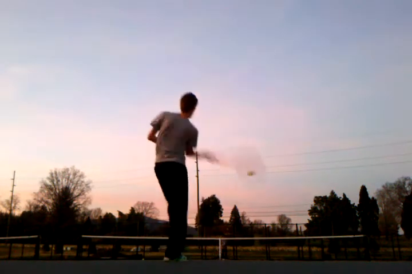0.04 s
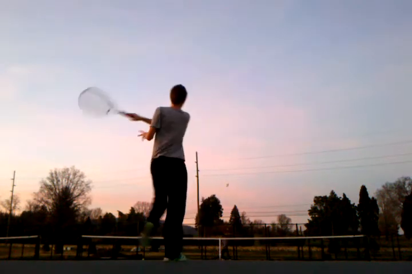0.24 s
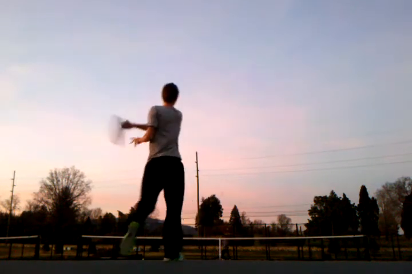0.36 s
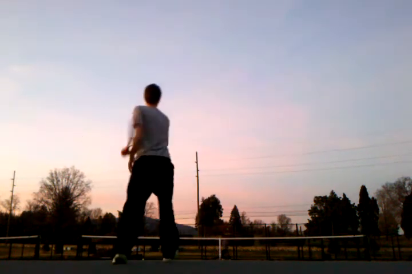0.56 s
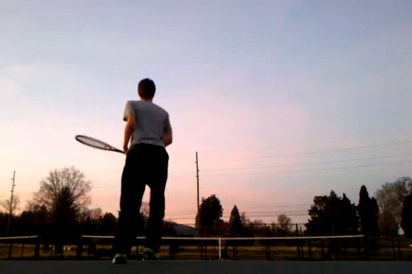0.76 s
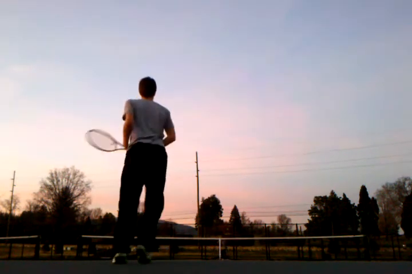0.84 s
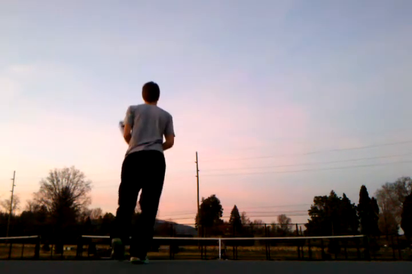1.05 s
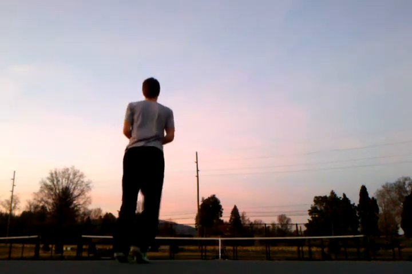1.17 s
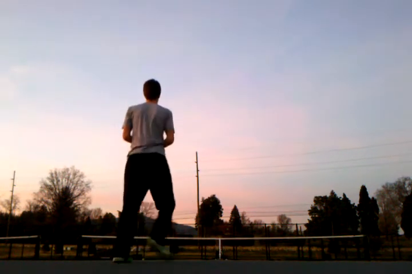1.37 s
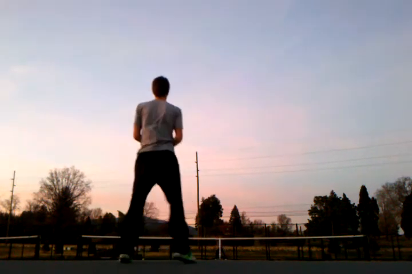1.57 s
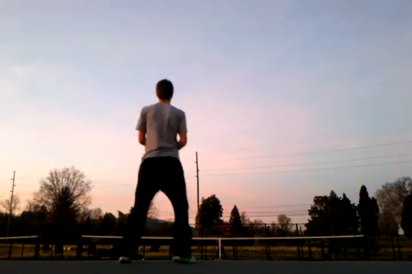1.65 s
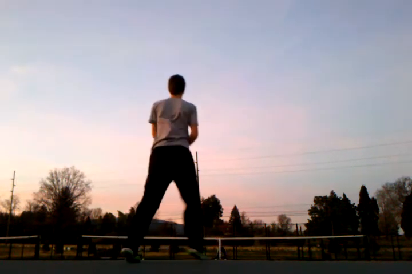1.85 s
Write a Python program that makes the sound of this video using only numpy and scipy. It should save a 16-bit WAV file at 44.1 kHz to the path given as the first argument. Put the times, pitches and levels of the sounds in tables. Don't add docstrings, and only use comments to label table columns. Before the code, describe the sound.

A racket strikes a tennis ball with a loud hollow pop, then shoes scuff gritty court

```python
import sys
import numpy as np
from scipy import signal
from scipy.io import wavfile
from scipy.ndimage import uniform_filter1d

SR = 44100
rng = np.random.default_rng(int(sys.argv[2]) if len(sys.argv) > 2 else 0)


def output_pcm(signal):
    pcm = np.clip(np.atleast_2d(signal).T, -1, 1) * 32767
    wavfile.write(sys.argv[1], SR, np.round(pcm).astype(np.int16))


def voltage_ratio(level):
    return 10 ** (np.asarray(level, float) / 20)


N = 83790

# frequency in Hz, density in dB per Hz.
TRAFFIC = [(30, -3.5), (100, 9.5), (140, -1.5), (260, -2), (320, -8.5), (750, -8.5), (1100, -13.5),
           (1600, -23.5)]
# time in seconds, level in dB.
TRAFFIC_LEVEL = [(0, -56), (.4, -53.5), (.75, -55.5), (1.2, -53.5), (1.5, -52.5), (1.9, -53.5)]
# frequency in Hz, level in dB.
HISS = [(500, -41.5), (1600, 4.5), (3000, 5.5), (5000, -17.5), (7000, -11)]
# time in seconds, level in dB.
SWING = [(.17, -67.5), (.2, -56.5), (.235, -50.5), (.27, -49), (.32, -66), (.36, -57), (.4, -65),
         (.46, -67.5)]
# frequency in Hz, level in dB.
SWISH = [(300, 0), (1500, 3), (4000, -0.5), (7000, 1.5)]
# start in seconds, level in dB, centre in Hz.
STONES = [(.6135, -49, 4600), (.6985, -49, 4000), (.922, -35.5, 5600), (1.1145, -45, 3500),
          (1.1245, -39, 4200), (1.128, -40, 4800), (1.132, -45, 5500), (1.311, -50, 5500),
          (1.3275, -44, 4300), (1.3445, -43, 5500), (1.3608, -39, 2500), (1.366, -47, 3000),
          (1.3838, -38, 6000), (1.3891, -34, 5000), (1.3935, -38, 6400), (1.416, -44, 3500),
          (1.4205, -47, 4000), (1.7055, -46, 4500), (1.7215, -46, 6200), (1.726, -45, 4600),
          (1.7375, -44, 6600), (1.7895, -45, 3800), (1.796, -50, 3000)]
# time in seconds, pressure in dB, share of coarse grit from 0 to 1.
DRAG = [(.975, -72, 0.7), (.995, -51, 0.54), (1.01, -46, 0), (1.045, -40, 0), (1.058, -30, 0.23),
        (1.076, -26.5, 0.2), (1.086, -35.5, 0.99), (1.096, -52, 0.7), (1.104, -67.5, 0.5)]
# start in seconds, rise in seconds, length in seconds, level in dB,
# share of coarse grit from 0 to 1, rubber level in dB.
SCUFFS = [(0.009, 0.0081, 0.064, -69, 0, 1.5), (0.438, 0.063, 0.089, -66, 0.6, 0),
          (0.585, 0.029, 0.45, -67, 0.52, -10), (0.656, 0.019, 0.024, -54.5, 0.68, 3),
          (0.68, 0.0058, 0.023, -63.5, 0.6, -1), (0.697, .008, 0.028, -62.5, 0.8, -2),
          (0.719, .012, .03, -69, 0.2, -7), (1.095, 0.035, 0.048, -58, 0.3, -5),
          (1.17, 0.0094, 0.041, -71, .5, -9), (1.321, 0.0068, 0.12, -65.5, 0.6, -10),
          (1.3842, .0005, .0075, -39.5, .4, -25), (1.3905, .003, .0045, -43, .4, -15),
          (1.4, 0.0054, 0.031, -72.5, 1, -2), (1.633, 0.14, 0.14, -80, 1, -5),
          (1.7356, 0.00055, 0.0092, -51, 0, -1), (1.746, 0.0012, 0.0062, -46.5, 0, -17.5)]
# frequency in Hz, level in dB.
FINE_GRIT = [(800, -50), (3000, -10), (5000, -2.5), (6000, -0.5), (6700, 4.5), (7500, 0.5)]
# frequency in Hz, level in dB.
COARSE_GRIT = [(700, -24.5), (1500, -11.5), (2350, -10), (2900, 2.5), (4200, 1.5), (5200, -0.5),
               (7000, -9.5)]
# frequency in Hz, level in dB.
RUBBER = [(800, -6), (1600, 6), (2500, -8), (4000, -3.5)]
# frequency in Hz, level in dB.
TAIL = [(150, 9), (300, 7.5), (1100, -1.5), (2000, -11.5), (4000, -11.5), (7000, -19.5)]
# frequency in Hz, time to fall 60 dB in seconds.
TAIL_T60 = [(200, 0.35), (1000, 0.93), (3000, 0.37), (7000, 0.98)]
# start in seconds, level in dB, centre in Hz, width in Hz.
RETURNS = [(.2485, -40, 6900, 500), (.2515, -33, 960, 130), (.2805, -46, 510, 480), (.2985, -52, 4600, 600),
           (.321, -50, 4300, 520), (.3425, -45, 4600, 500), (.3505, -47, 4300, 500), (.328, -50, 1050, 150),
           (.345, -49, 1100, 200), (.3525, -42.5, 1200, 200), (.388, -52, 960, 200), (.454, -54, 1050, 200)]
# start in seconds, level in dB.
TICKS = [
    (.2375, -18),
    (.23855, -10),
    (.61338, -33),
    (.61363, -38),
    (.9972, -42),
    (.99745, -41),
]
# start in seconds, level in dB, pitch in Hz, length in cycles, place of the peak from 0 to 1.
BLOWS = [(.2368, -16.5, 948, 9.4, .6), (.2383, -8.3, 290, 1.6, .21), (.2389, -18, 1300, .9, .35),
         (.2386, -25, 6400, 9, .3), (.2385, -25, 4500, 6, .35), (.61405, -29, 290, 1.5, .42),
         (.6142, -51, 1590, 6, .4), (.6139, -44, 1020, 2, .3), (.61325, -51, 3100, 7, .3),
         (.9978, -35, 330, 1.25, .25), (.9974, -54, 1540, 8, .4), (1.0021, -45, 400, 2.6, .3),
         (1.3833, -32, 3100, 4, .4), (1.3848, -32, 4900, 7, .45), (1.3872, -36, 5700, 8, .4),
         (1.3838, -48, 450, 1.8, .3), (1.383, -47, 157, 2, .4), (1.384, -50, 860, 6, .3),
         (1.7371, -42.5, 520, 2.2, .25)]
# time in seconds, level in dB.
CONTACTS = [
    (.23751, -9),
    (.23862, 0),
    (.24191, -11),
]
# frequency in Hz, level in dB, time to fall 60 dB in seconds.
RACKET = [(735, -21, 0.03), (957, -36, 0.11), (1080, -38.5, 0.13), (1310, -26.5, 0.063), (1635, -44, 0.11),
          (1706, -36, 0.066), (1980, -41, 0.078), (2135, -45.5, 0.098), (2640, -34, 0.0073),
          (3370, -43, 0.054), (3820, -52, 0.3), (4176, -24.5, 0.019), (4570, -37, 0.018),
          (2480, -36.5, .02), (3560, -42, 0.018), (5140, -34, .012), (5350, -38, .015), (6130, -30, .012),
         (6600, -31, 0.016)]
# frequency in Hz, level in dB.
CRACK = [(800, 2), (2600, -2.5), (3100, -21), (3700, 2.5), (5000, -3.5), (5600, -5), (6500, -5.5)]
# frequency in Hz, response in dB.
MIC = [(30, -33), (80, -20), (120, -2), (200, 0), (5800, 2), (6700, 4), (7100, -2), (7600, -17),
       (8200, -27), (9000, -35), (9600, -70), (11000, -95)]


def evened(x):
    return x / np.sqrt(np.mean(x ** 2) + 1e-20)


def read(points, hz):
    f, value = np.transpose(points)
    return np.interp(np.log(hz + 1), np.log(f + 1), value)


def curve(points, column=1):
    table = np.array(points)
    return np.interp(np.arange(N) / SR, table[:, 0], table[:, column])


def add(mix, s, sound):
    part = mix[max(round(s * SR), 0):][:len(sound)]
    part += sound[:len(part)]


def colour(x, points):
    log_gain = read(points, abs(np.fft.fftfreq(4096, 1 / SR))) * np.log(10) / 20
    taps = np.fft.ifft(np.exp(np.conj(signal.hilbert(log_gain)))).real[:2048]
    taps = taps * np.cos(np.arange(2048) * np.pi / 4096) ** 2
    return signal.oaconvolve(x, taps)[:len(x)]


def noise(points, length=N):
    return colour(rng.standard_normal(length), points)


def distant_traffic():
    frames, hz = N // 256 + 5, np.fft.rfftfreq(1024, 1 / SR)
    a, b, patches = rng.standard_normal((frames, 513, 3)).T
    patches = uniform_filter1d(patches, size=10, axis=0)
    patches = evened(uniform_filter1d(patches, size=8, axis=1))
    octaves_above = np.log2(np.maximum(hz / TRAFFIC[-1][0], 1))
    density = read(TRAFFIC, hz) - 14.5 * octaves_above
    z = (a + 1j * b) * voltage_ratio(density[:, None] + 0.87 * patches)
    hum = evened(signal.istft(z, nperseg=1024, noverlap=768)[1][:N])
    return voltage_ratio(curve(TRAFFIC_LEVEL)) * hum + voltage_ratio(-69) * noise(HISS)


def swish():
    return voltage_ratio(curve(SWING)) * evened(noise(SWISH))


def stones():
    out = np.zeros(N)
    ring_cycles = 2.6
    for s, db, hz in STONES:
        cycles = np.arange(200) / SR * hz
        add(out, s, voltage_ratio(db) * np.exp(-cycles * np.pi / ring_cycles) * np.sin(2 * np.pi * cycles))
    return out


def grit(points):
    grains_per_s, spread_db = 7000, 3
    size = voltage_ratio(spread_db * np.minimum(rng.exponential(1, N), 5))
    sign = rng.choice([-1., 1.], N)
    clicks = size * sign * (rng.random(N) < grains_per_s / SR)
    return evened(colour(clicks, points))


def soles():
    pressure, share = curve(DRAG), curve(DRAG, column=2)
    level = voltage_ratio(pressure) * (pressure > -71)
    fine, coarse, rub = level * np.sqrt(1 - share ** 2), level * share, np.zeros(N)
    for s, rise, length, db, part, rubber_db in SCUFFS:
        t = np.arange(0, length, 1 / SR)
        fall = np.clip((t - rise) / max(length - rise, .001), 0, 1)
        shape = voltage_ratio(db) * np.minimum(t / rise, 1) * np.cos(np.pi / 2 * fall)
        add(fine, s, shape * np.sqrt(1 - part ** 2))
        add(coarse, s, shape * part)
        add(rub, s, shape * voltage_ratio(rubber_db))
    return fine * grit(FINE_GRIT) + coarse * grit(COARSE_GRIT) + rub * grit(RUBBER)


def court_tail():
    out = np.zeros(N)
    hz, at, z = signal.stft(noise(TAIL, SR), SR, nperseg=256)
    decay = voltage_ratio(-60 * at / read(TAIL_T60, hz)[:, None])
    tail = signal.istft(z * decay, SR, nperseg=256)[1]
    add(out, CONTACTS[0][0] + 0.0036, voltage_ratio(-45.5) * tail / tail[:2000].std())
    return out


def fence_returns():
    wall_s, spread_s = 0.361, 0.006
    wall = np.exp(-.5 * ((np.arange(N) / SR - wall_s) / spread_s) ** 2)
    out = voltage_ratio(-49.5) * wall * evened(noise(TAIL))
    t = np.arange(2000) / SR
    for s, db, hz, width in RETURNS:
        u = np.pi * width * t
        add(out, s, voltage_ratio(db) * u * np.exp(1 - u) * np.sin(2 * np.pi * hz * t))
    return out


def blows():
    out = np.zeros(N)
    for s, db, hz, cycles, peak in BLOWS:
        t = np.arange(0, cycles / hz, 1 / SR)
        bend = np.log(.5) / np.log(peak)
        swell = np.sin(np.pi * (t * hz / cycles) ** bend) ** 2.42
        add(out, s, -voltage_ratio(db) * swell * np.sin(2 * np.pi * hz * t))
    tick_s = .00015
    u = np.arange(200) / SR / tick_s
    for s, db in TICKS:
        add(out, s, voltage_ratio(db) * u * np.exp(1 - u))
    return out


def racket():
    t, out = np.arange(SR // 2) / SR, np.zeros(N)
    ring = sum(voltage_ratio(db - 60 * t / t60) * np.sin(2 * np.pi * hz * t) for hz, db, t60 in RACKET)
    crack_t60, fizz_t60 = 0.016, 0.098
    decay = voltage_ratio(-16 - 60 * t / crack_t60) + voltage_ratio(-41.5 - 60 * t / fizz_t60)
    for s, db in CONTACTS:
        add(out, s, voltage_ratio(db) * (ring + noise(CRACK, len(t)) * decay))
    return out


def scene():
    hit = blows() + racket() + court_tail() + fence_returns()
    player = swish() + soles() + stones()
    return (hit + player + distant_traffic())[None]


def roll_off(x):
    return signal.sosfilt(signal.butter(12, 9130, fs=SR, output="sos"), x)


def record(dry):
    heard = colour(dry[0], MIC) + voltage_ratio(-100) * rng.standard_normal(N)
    return roll_off(heard[None])


dry = scene()
out = record(dry)
output_pcm(out)
```